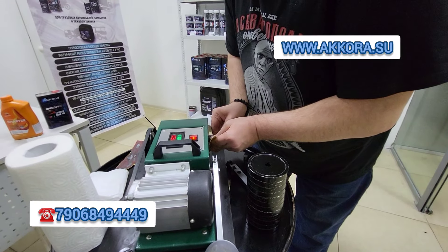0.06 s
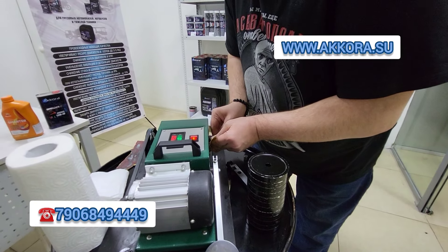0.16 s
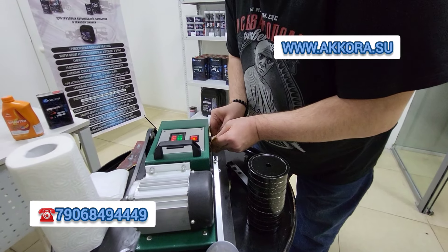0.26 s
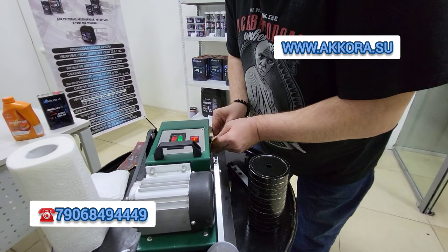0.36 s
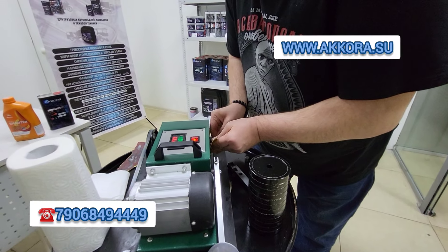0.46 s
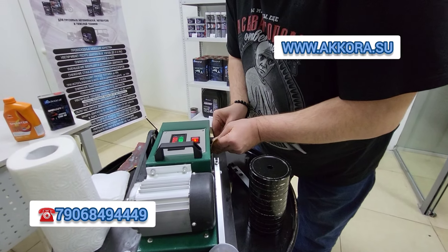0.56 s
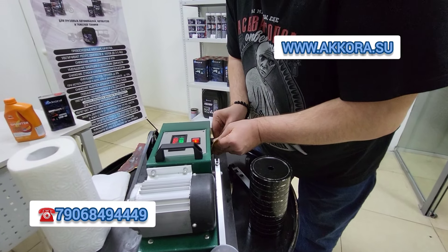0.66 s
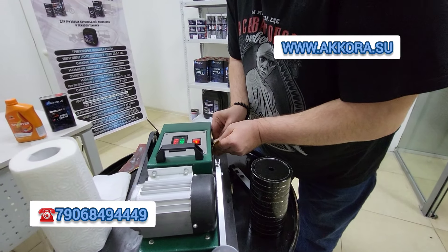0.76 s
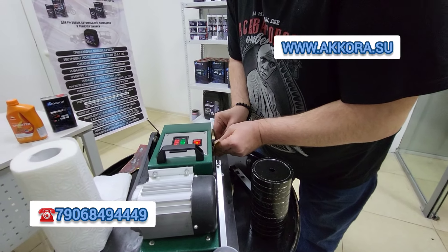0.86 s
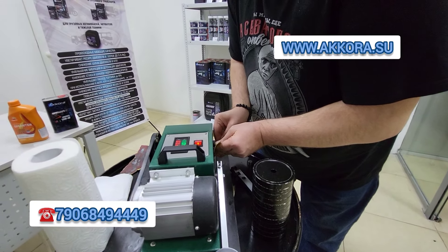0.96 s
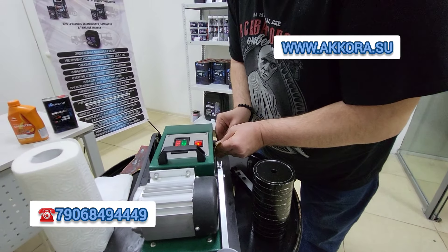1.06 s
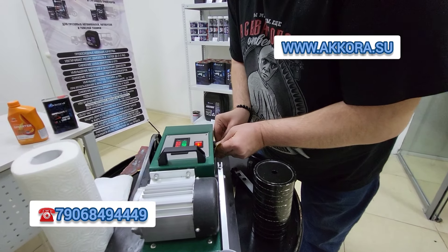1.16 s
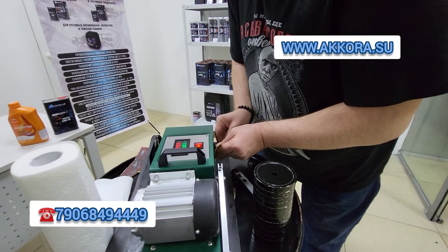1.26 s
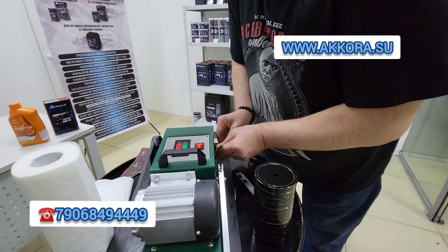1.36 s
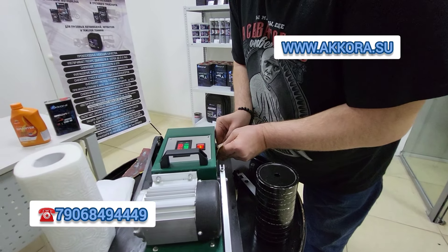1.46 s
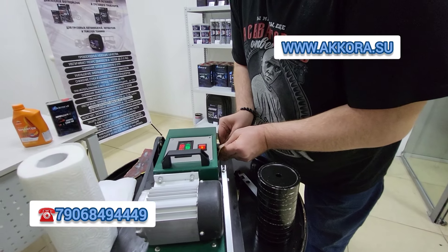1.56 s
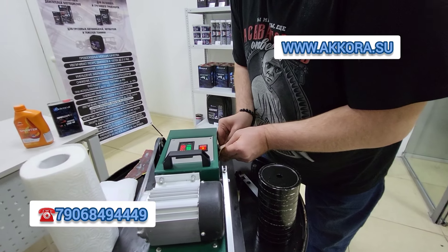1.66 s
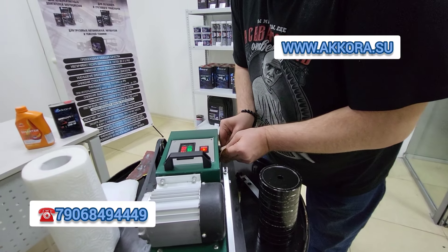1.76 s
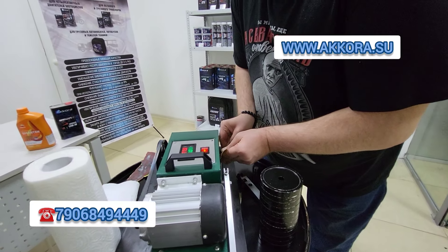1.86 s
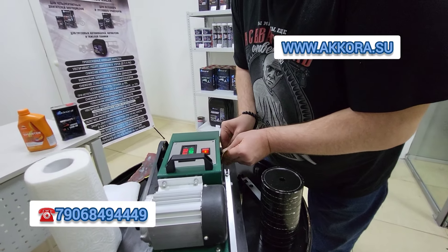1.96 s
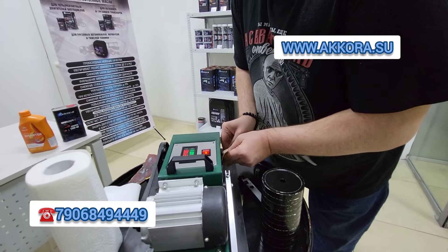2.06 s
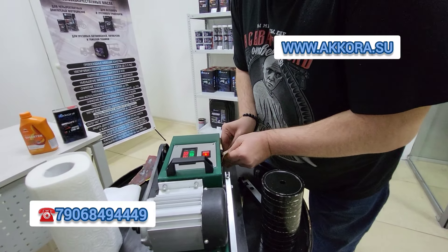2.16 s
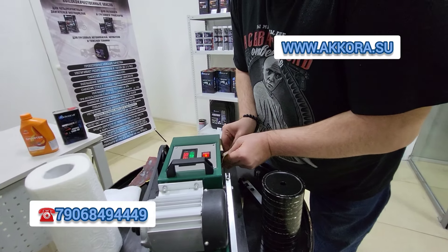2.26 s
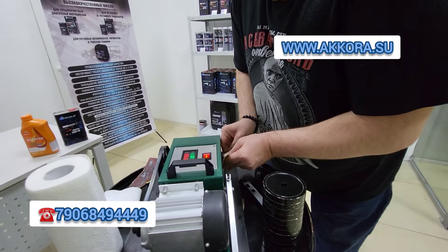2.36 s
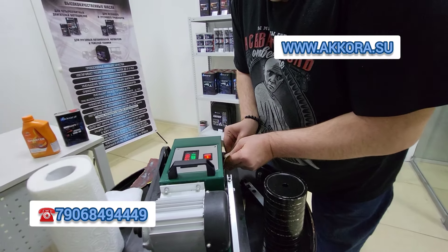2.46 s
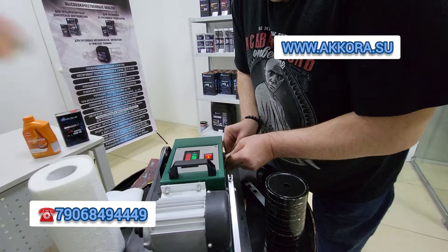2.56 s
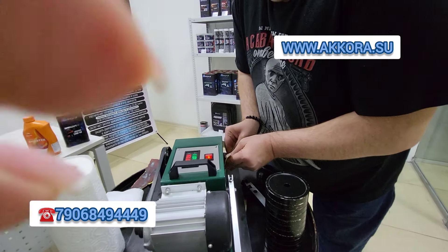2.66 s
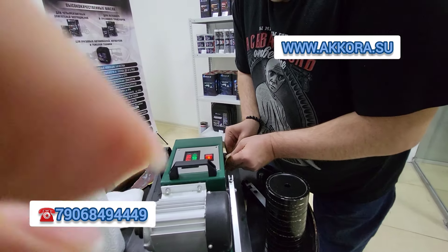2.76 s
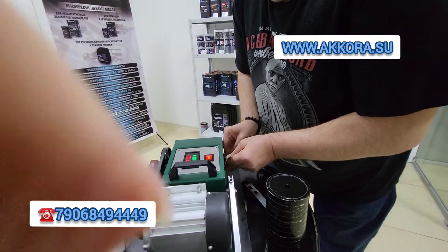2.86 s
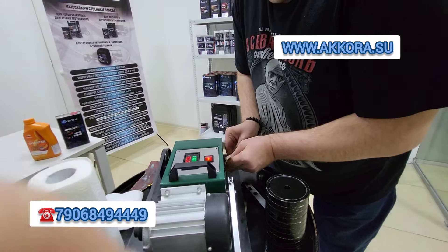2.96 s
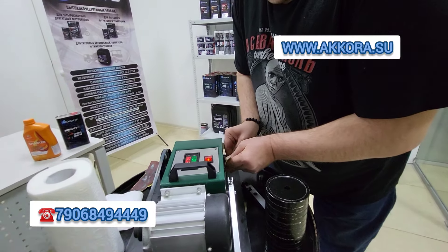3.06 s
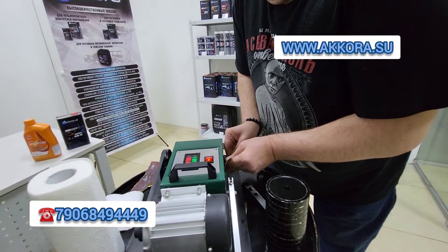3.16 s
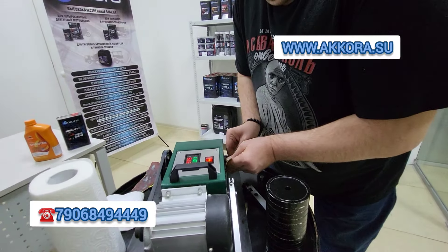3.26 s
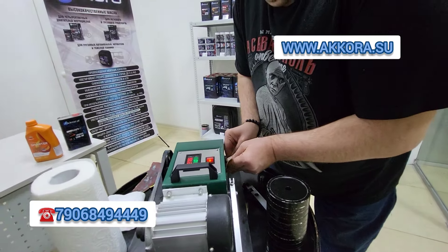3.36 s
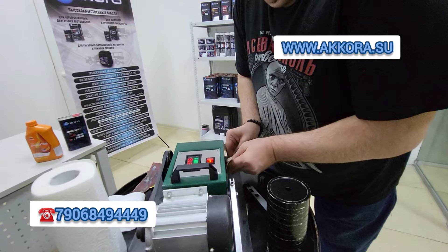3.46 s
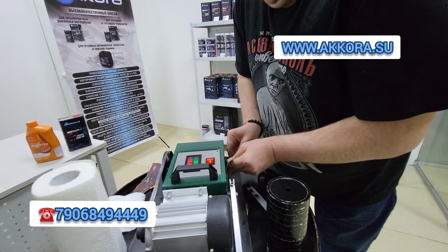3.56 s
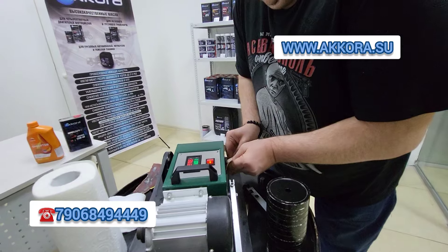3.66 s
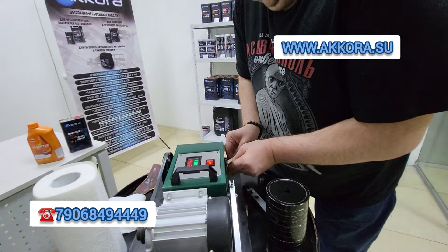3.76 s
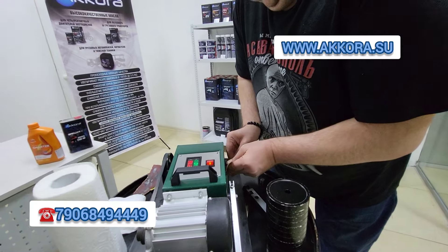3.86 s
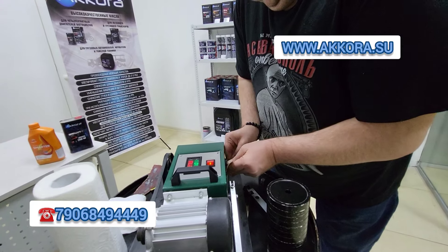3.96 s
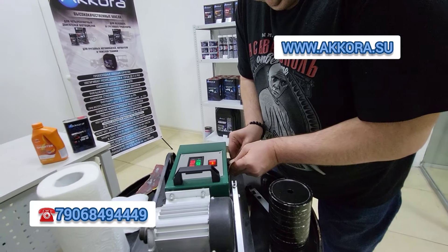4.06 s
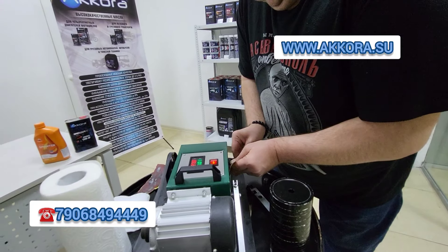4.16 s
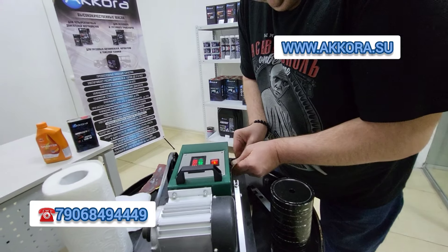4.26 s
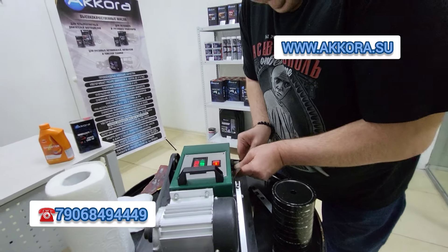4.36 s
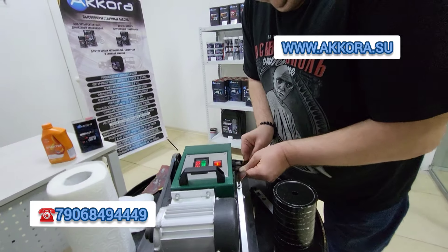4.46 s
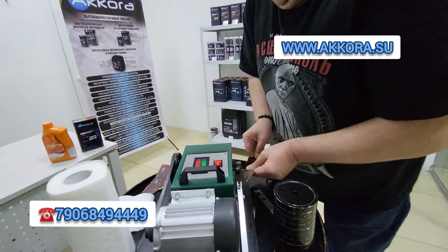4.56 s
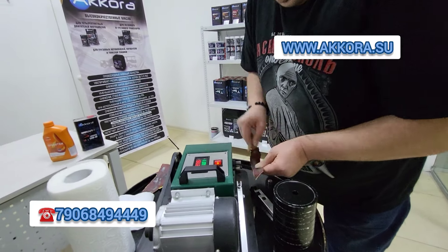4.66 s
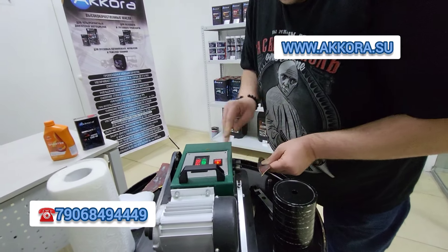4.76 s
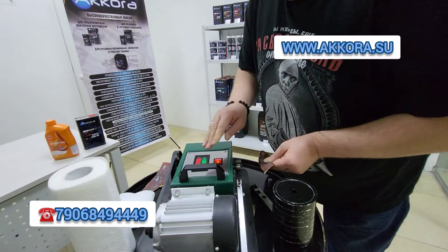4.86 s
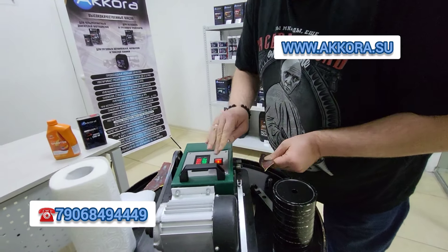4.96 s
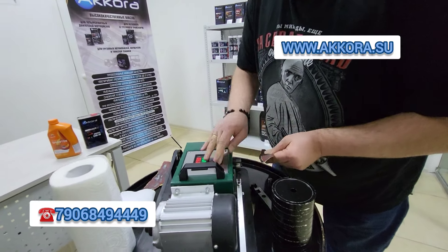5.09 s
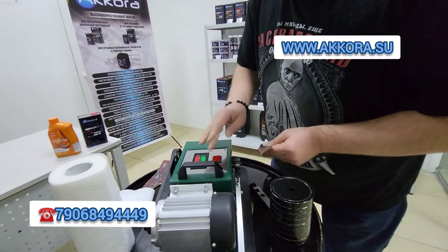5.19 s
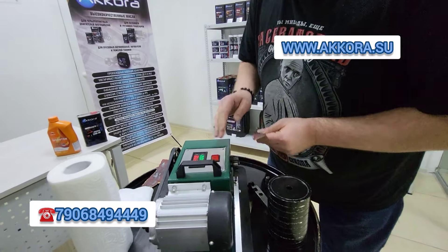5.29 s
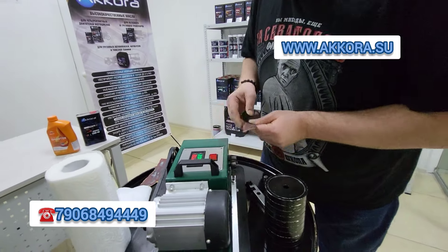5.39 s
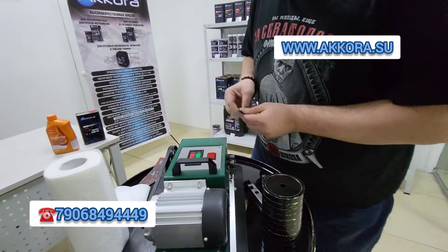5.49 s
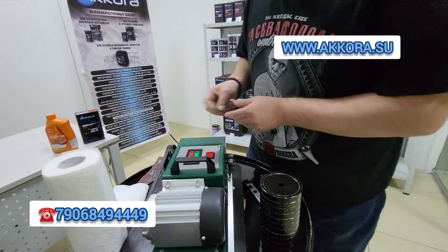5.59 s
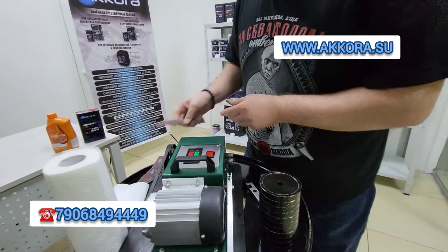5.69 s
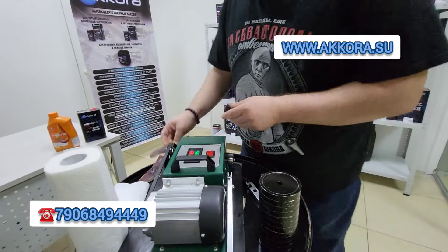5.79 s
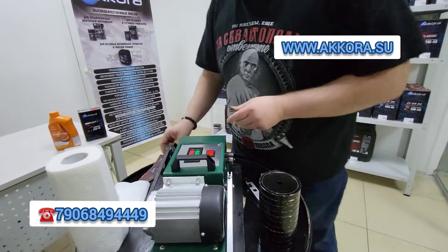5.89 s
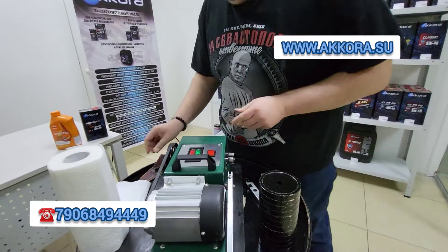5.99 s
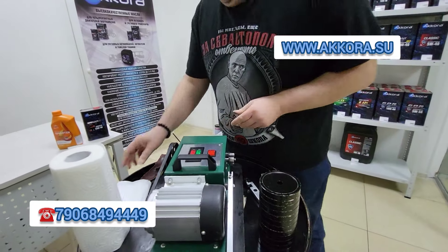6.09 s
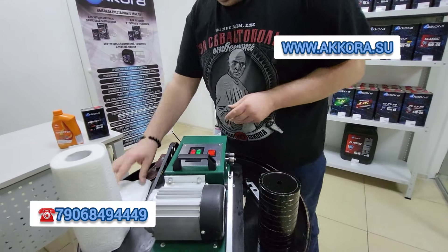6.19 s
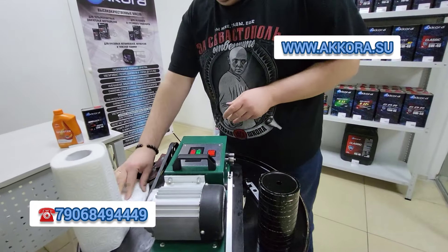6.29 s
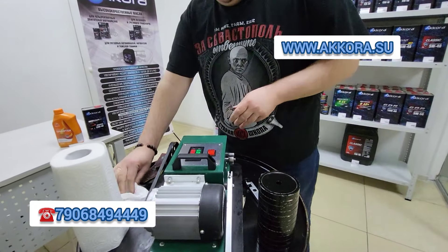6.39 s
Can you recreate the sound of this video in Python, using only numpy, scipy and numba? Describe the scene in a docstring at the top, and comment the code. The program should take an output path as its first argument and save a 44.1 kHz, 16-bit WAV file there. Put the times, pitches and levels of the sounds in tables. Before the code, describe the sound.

Gritty sanding on a motor-driven steel roller stops, a loud switch click cuts the motor's hum, and soft rustling follows in a small workshop.

```python
"""An induction motor hums in a small workshop while an abrasive strip is held to its steel roller.
Grit impacts hiss and excite the resonances of steel and strip, whose pitch slides with the grip.
At about 4.4 s the strip catches and is pulled away; at 5.05 s the stop switch snaps, its box rings
and the motor dies away. Then cloth and paper rustle as someone moves round the bench.
A phone hears it all from about a metre, through two microphone ports."""
import sys
import numpy as np
from scipy import signal
from scipy.fft import rfft, irfft, next_fast_len
from scipy.io import wavfile
from numba import njit

SR = 44100
rng = np.random.default_rng(int(sys.argv[2]) if len(sys.argv) > 2 else 0)


def waveform_to_disk(signal):
    """Save audio, clipped to [-1, 1], as 16-bit WAV at the path in sys.argv[1]."""
    frames = np.transpose(np.atleast_2d(signal))
    scaled = np.clip(frames, -1, 1) * 32767
    samples = np.round(scaled).astype(np.int16)
    wavfile.write(sys.argv[1], SR, samples)


N = 283541
TIME = np.arange(N) / SR
FFT_SIZE = next_fast_len(N, real=True)
FREQ = np.maximum(np.arange(FFT_SIZE // 2 + 1) * SR / FFT_SIZE, 1)
LIFT_S, STOP_S = 4.371, 5.05  # the strip leaves the roller; the power is cut


# Ring of the steel, shifting with the point of contact: time_s, pitch_hz, relative_db
ROLLER_RING = [(0, 4380, 1), (1.15, 4500, -2), (1.42, 4520, -6), (2.5, 4240, -10.5), (2.78, 4400, 0),
               (3.05, 4650, -3.5), (3.35, 4280, -4), (3.8, 4350, -2), (4.3, 4200, -2.5)]
# Steady modes of the steel and the rig's arm: pitch_hz, width_hz, relative_db, left_minus_right_db
STEEL_MODES = [(3160, 490, -6.5, 22)]
ARM_MODES = [(1795, 27, -9, -6), (2122, 280, -6.5, -7.5)]

def rubbing():
    """Forced vibration: broadband friction drives the steel, the arm and the strip at their resonances."""
    ring_hz, ring_db = curves(ROLLER_RING)
    friction = abrasion()
    steel = undb(1) * unit(band(ring_hz, width_hz=770.0) * sides(10.5)) + ringing(STEEL_MODES)
    arm = ringing(ARM_MODES)
    strip = taut_strip()
    # a shallow spectral dip follows just under the ring
    hollow = 0.31 * np.array([sweep(channel, 0.82 * ring_hz, 390.0) for channel in friction])
    sound = friction - hollow + arm + undb(ring_db + 1.5 * walk(6.6)) * steel + strip
    # once the strip is lifted only the room rings on
    contact = sustain(LIFT_S, t60=0.41)
    return sound * undb(-35.5 + 0.5 * walk(23)) * contact


# Spectra of the fine hiss and the coarse bite of the grit: frequency_hz, relative_db
HISS_SPECTRUM = [(2940, -14.5), (5000, -2.5), (5270, -2), (5630, 1.5), (6100, -0.5), (7000, 1.5), (7660, 2),
                 (9300, -6.5), (10800, -4), (11600, -7.5), (12900, -1.5), (14500, -6.5), (15500, -9)]
BITE_SPECTRUM = [(590, -29), (1000, -21), (1120, -0.5), (1240, -12.5), (1370, -5), (1660, -1), (1800, -0.5),
                 (1910, -1.5), (3500, -3), (4550, -14), (7700, -120)]
# Stereo balance of both: frequency_hz, left_minus_right_db
ABRASION_BALANCE = [(900, 6), (1400, -5.5), (2200, -5.5), (3100, 2), (4000, -4.5), (4900, 9.5),
                    (5900, -1.5), (6800, 4), (7700, -8), (8800, 0), (10200, -7), (11600, -2), (14200, -9.5)]

def abrasion():
    """Friction noise: countless random grit impacts sum to a hiss, and pressure adds a coarse bite."""
    pull = np.clip(1 + (TIME - LIFT_S) / 0.3, 0, 1)  # the strip bites harder as it is dragged off
    grit = unit(rng.standard_normal(N) * rng.random(N) ** 2)
    direct = unit(np.array([grit, np.roll(grit, 15)]))  # the straight path reaches the left port first
    coarse = room(grit, t60=0.14, coherent_share=0.76) + undb(-8.5) * direct
    fine = room(grit, t60=0.1, coherent_share=0.38) + undb(-7) * direct
    fine = hand_reflection(fine, delay_s=0.0011, gain=0.36)
    balance = sides(across(ABRASION_BALANCE))
    hiss = undb(4.5 + 1.5 * pull) * shape(fine, undb(across(HISS_SPECTRUM)) * balance)
    bite = undb(-0.5 + 4.5 * pull) * shape(coarse, undb(across(BITE_SPECTRUM)) * balance)
    return hiss + bite


# Resonance of the strip as the grip is held, slackened and drawn tight: time_s, pitch_hz
STRIP_PITCH = [(0, 4940), (1.24, 5100), (1.35, 3060), (1.55, 2960), (2.34, 2750), (2.47, 6040),
               (2.56, 6900), (2.75, 7600), (4.39, 7700)]

def taut_strip():
    """Resonance under tension: pitch follows the grip, loudest when freshly laid on or sliding."""
    grip_hz, = curves(STRIP_PITCH)
    octaves_per_s = np.abs(np.gradient(np.log2(grip_hz))) * SR
    sliding = np.tanh(octaves_per_s / 1.8)
    fresh = np.exp(-(TIME / 0.71) ** 2)
    pitch_hz = grip_hz * (1 + 0.014 * walk(12))  # the fingers tremble
    fundamental = band(pitch_hz, width_hz=1100.0)
    octave = band(np.minimum(2 * pitch_hz, SR / 3), width_hz=790.0) * sides(-15)
    ring = fundamental + undb(-15.5 + 9 * fresh) * octave
    return undb(-10 + 7 * fresh + 7 * sliding) * ring * sides(4)


# Rasps where the strip bites harder: centre_s, half_length_s, level_db
STRIP_RASPS = [(.22, .05, -35), (0.507, 0.066, -35.5), (.75, 0.092, -32), (.98, 0.075, -34),
               (1.478, .067, -32), (1.703, 0.066, -34), (1.93, 0.089, -34), (2.35, 0.061, -34),
               (2.862, .08, -37), (3.437, 0.15, -35), (3.99, 0.11, -33), (4.248, .092, -32.5)]
# Catches of its edge as it leaves the roller: start_s, level_db, t60_s
EDGE_CATCHES = [(4.346, -21, 0.14), (4.367, -25, 0.045), (4.384, -25, 0.071)]

def snags():
    """Friction transients: a harder bite swells smoothly, a catch starts at once and decays."""
    rasps = sum(undb(db) * np.exp(-2 * ((TIME - centre) / half_length) ** 2)
                for centre, half_length, db in STRIP_RASPS)
    catches = sum(undb(db) * fade(start, t60) for start, db, t60 in EDGE_CATCHES)
    return rasps * noise(peak(2640, width_hz=1170)) + catches * noise(peak(1940, width_hz=1900))


# Magnetic hum of the stator: harmonic_number, level_db
STATOR_HUM = [(1, -32.5), (2, -59), (3, -55.5), (4, -65.5), (5, -78.5), (6, -66.5), (9, -61.5), (10, -65)]
# Whine of the rotor slots: shaft_multiple, sideband_in_hum_multiples, relative_db
ROTOR_WHINE = [(22, -1, -60), (22, 0, -45), (23, 0, -53), (22, 1, -56), (22, 3, -56), (22, 4, -51),
               (44, 0, -52), (44, 3, -58), (66, -3, -57), (21, 0, -63), (25, 0, -64), (20, 0, -66)]
# Tones of the shaken bench, which beat against the hum: pitch_hz, relative_db
BENCH_TONES = [(63.3, -60), (108, -53), (112.4, -50), (116.6, -56), (121, -57), (209.5, -59), (224.5, -63),
               (475, -65), (551, -59), (899.7, -53)]
# Noise of the bearings: frequency_hz, relative_db
BEARING_SPECTRUM = [(410, -39), (700, -24.5), (916, -1.5), (1230, -13), (1360, -6), (1610, -25.5),
                    (1780, -15), (2030, -16.5), (2400, -14.5), (2760, -28), (3020, -21), (3180, -32.5),
                    (6520, -32.5), (14100, -41.5), (15000, -39.5)]
# Resonances of the bench: pitch_hz, width_hz, level_db
BENCH_MODES = [(62, 39, -55), (115, 19, -49), (144, 20, -72), (198, 140, -56.5)]
HUM_HZ, SHAFT_HZ = 100.05, 24.655

def motor():
    """Magnetic force pulses at twice the mains frequency; rotation adds whine, noise and vibration."""
    hum_cycles = HUM_HZ * TIME
    coasting = np.exp(-np.maximum(TIME - STOP_S, 0) / 4.7)
    speed = (1 + 0.0004 * walk(1.8)) * coasting
    shaft_turns = np.cumsum(SHAFT_HZ * speed) / SR
    hum = sum(tone(harmonic * hum_cycles, db, waver=6.0) for harmonic, db in STATOR_HUM)
    whine = sum(tone(multiple * shaft_turns + sideband * hum_cycles, db, waver=2.0)
                for multiple, sideband, db in ROTOR_WHINE)
    shake = sum(tone(hz * TIME, db, waver=-3.5) for hz, db in BENCH_TONES)
    rolling = room(rng.standard_normal(N), t60=0.98, coherent_share=0.71)
    load_db = 0.84 * np.sin(2 * np.pi * shaft_turns)  # the bearings are loaded once a turn
    bearings = undb(-42.3 + load_db) * shape(rolling, undb(across(BEARING_SPECTRUM)))
    fan = undb(-53.5) * noise(peak(565, width_hz=130))
    bench = sum(undb(db) * noise(peak(hz, width)) for hz, width, db in BENCH_MODES)
    return sides(1) * (hum * sustain(STOP_S, t60=0.3)
                       + undb(-1.9) * whine * sustain(STOP_S, t60=0.33)
                       + (undb(-5) * shake + fan + bench) * sustain(STOP_S, t60=0.83)
                       + bearings * sustain(STOP_S, t60=0.6))


# Trigger, slam and bounce of the switch: start_s, relative_db, t60_s, tilt_db_per_octave
SWITCH_IMPACTS = [(5.045, -16.5, .016, 3), (5.0474, -2, 0.012, 0.5), (5.0505, -14.5, 0.014, -1)]
# Spectra of the snap and of the room's answer: frequency_hz, relative_db
SNAP_SPECTRUM = [(240, -40), (400, -8.5), (570, -24), (863, -16), (1230, -17.5), (1520, -3), (2310, -5.5),
                 (3390, -17.5), (5060, -7.5), (6090, -10), (7550, -24.5), (8410, -15.5), (11300, -12),
                 (15800, -21.5)]
WALL_SPECTRUM = [(280, -29.5), (480, -6), (615, -16.5), (861, -1), (1280, -21), (1420, -6), (1590, -14.5),
                 (2100, -2.5), (3450, -11.5), (6110, -14.5), (7170, -20.5), (8800, -14.5), (15800, -19)]
# Modes of the switch box and frame: pitch_hz, level_db, t60_s
BOX_MODES = [(83.3, -34.5, 0.53), (151.8, -25.5, 0.27), (194, -13.5, .16), (226, -21, 0.12),
             (820, -39.5, 0.27), (910, -36.5, .33), (1456, -29, 0.15), (1810, -29, 0.15), (2280, -8, .015),
             (2360, -25.5, .09), (2620, -36.5, 0.086), (2800, -42.5, 0.26), (3050, -38, 0.22),
             (4500, -41.5, .2), (4900, -20, 0.013), (5900, -33.5, .12), (8635, -39.5, .17)]

def stop_switch():
    """Impact excitation: the contacts slam open, the box rings in damped modes, the room reverberates."""
    colour = undb(across(SNAP_SPECTRUM))
    octaves = np.log2(FREQ / 3000)
    snap = sum(undb(db) * fade(start, t60) * noise(colour * undb(tilt * octaves))
               for start, db, t60, tilt in SWITCH_IMPACTS)
    slam_s = SWITCH_IMPACTS[1][0]
    age_s = np.maximum(TIME - slam_s, 0)
    ring = np.zeros(N)
    for hz, db, t60 in BOX_MODES:
        build_up = 1 - np.exp(-(hz * age_s) ** 2)  # takes about a cycle, so the thump comes late
        ring += undb(db) * fade(slam_s, t60) * build_up * np.sin(2 * np.pi * hz * age_s)
    walls = undb(-22.5) * fade(slam_s, t60=0.24) * noise(undb(across(WALL_SPECTRUM)))
    tail = undb(-42.5) * fade(slam_s, t60=0.54) * noise(peak(1500, width_hz=3000))
    return undb(-4.5) * snap * sides(-2.5) + ring + walls + tail


# Strokes of cloth and paper: peak_s, attack_s, hold_s, relative_db
RUSTLE_STROKES = [(5.685, 0.027, 0.014, -43.5), (5.887, 0.018, .07, -56), (6.053, 0.065, 0.035, -37.5),
                  (6.171, 0.083, .22, -39.5)]
# Spectra of the soft rustle and its crisp edge: frequency_hz, relative_db
CLOTH_SPECTRUM = [(260, -36), (450, -14), (595, -16), (823, -8), (890, -12), (930, -4.5), (1420, -5.5),
                  (1920, 0.5), (2810, -3.5), (3110, -8), (4250, -7.5), (6500, -19), (8450, -44),
                  (14300, -120)]
CRISP_SPECTRUM = [(3240, -22), (5500, -3.5), (7970, -5.5), (11400, -15.5), (13100, -13), (15800, -15)]
# Stereo balance of both: frequency_hz, left_minus_right_db
RUSTLE_BALANCE = [(400, 10), (1300, -2), (2400, -4), (4400, 7), (8100, -4), (15000, -6)]

def rustle():
    """Sliding friction of cloth and paper: strokes add in power, and stronger ones sound crisper."""
    envelope = np.sqrt(sum((undb(db) * swell(peak_s, attack, hold, t60=0.38)) ** 2
                           for peak_s, attack, hold, db in RUSTLE_STROKES))
    force = envelope / undb(-40)
    balance = sides(across(RUSTLE_BALANCE))
    cloth = undb(2) * envelope * noise(undb(across(CLOTH_SPECTRUM)) * balance)
    crisp = undb(-45.5) * force ** 1.1 * noise(undb(across(CRISP_SPECTRUM)) * balance)
    return (cloth + crisp) * undb(0.66 * walk(70))


# Bumps of the body against the bench: peak_s, hold_s, level_db
BODY_BUMPS = [(5.7, 0.062, -53.5), (5.89, 0.028, -58), (6.017, .1, -53.5), (6.225, .085, -47.5)]
# Their spectrum: frequency_hz, relative_db
BUMP_SPECTRUM = [(29, -37), (50, -12), (151, -9.5), (253, -12.5), (290, -9), (325, -14.5), (600, -20),
                 (780, -22), (1320, -120)]

def bumps():
    """Soft impacts: a slow, yielding contact excites mostly low frequencies."""
    envelope = sum(undb(db) * swell(peak_s, 0.023, hold, t60=0.81) for peak_s, hold, db in BODY_BUMPS)
    return envelope * noise(undb(across(BUMP_SPECTRUM)))


# The press of the stop button just before the switch snaps, then light knocks round the bench: start_s,
# level_db, t60_s, pitch_hz
PRESS_AND_KNOCKS = [(5.03, -34, 0.037, 183.5), (5.242, -59, .04, 3500), (5.478, -59, .03, 5000),
                    (5.569, -65, .02, 4450), (5.877, -47, 0.025, 4170), (5.916, -41.5, 0.079, 2130),
                    (5.939, -42.5, 0.1, 109)]

def knocks():
    """Heavily damped impacts: each is a short burst of noise in one broad resonance."""
    sound = np.zeros((2, N))
    for start, db, t60, hz in PRESS_AND_KNOCKS:
        body = peak(hz, width_hz=0.95 * hz)
        burst = ports() * fade(start, t60)
        sound += undb(db) * filtered(burst, unit(body))
    return sound


# Background noise of the room: frequency_hz, relative_db
AIR_SPECTRUM = [(20, -19.5), (35, -8.5), (55, 5), (78, -9), (130, -7), (260, -6.5), (420, -11.5),
                (770, -32.5), (2000, -25.5), (3000, -28), (6300, -24), (9200, -31), (15800, -29.5)]

def workshop():
    """Ambient noise floor: a quiet diffuse field with a trace of mains hum."""
    air = noise(undb(across(AIR_SPECTRUM))) * undb(-62.5 + 0.4 * walk(4.02))
    return air + tone(HUM_HZ * TIME, db=-68.0, waver=-2.0)


# Likeness of the sound at the two microphone ports: frequency_hz, correlation
PORT_COHERENCE = [(25, .5), (60, 0.59), (130, 0.62), (300, 0.74), (640, .93), (1400, 0.44), (3000, 0.091),
                  (15000, .01)]

def ports():
    """Diffuse-field coherence: white noise, alike at both ports in the bass, unrelated in the treble."""
    coherence = across(PORT_COHERENCE)
    mid, side = rfft(rng.standard_normal((2, FFT_SIZE)))
    spectra = mid * np.sqrt(1 + coherence) + np.array([[1], [-1]]) * side * np.sqrt(1 - coherence)
    return unit(irfft(spectra, FFT_SIZE)[:, :N])


def room(x, t60, coherent_share):
    """Reverberation: part of the power is x convolved with a decaying tail, the rest diffuse noise."""
    reflected = shape(x, rfft(ports() * fade(0, t60), FFT_SIZE))
    return np.sqrt(coherent_share) * reflected + np.sqrt(1 - coherent_share) * ports()


def hand_reflection(x, delay_s, gain):
    """Comb filtering: an echo off the moving hand makes wandering peaks and dips."""
    lags = delay_s * SR * (1 + 0.063 * np.array([walk(2.6), walk(1.9)]))
    samples = np.arange(N)
    echo = np.array([np.interp(samples - lag, samples, channel) for channel, lag in zip(x, lags)])
    return unit(x + gain * echo)


def tone(cycles, db, waver):
    """Amplitude modulation of a partial; high ones waver more and differ more between the ports."""
    mean_hz = cycles[-1] / TIME[-1]
    height = min(mean_hz / 1200, 1)
    phase = rng.uniform(0, 2 * np.pi) + 1.4 * height ** 2 * rng.standard_normal((2, 1))
    return np.sqrt(2) * undb(db + waver * height * walk(5.9)) * np.sin(2 * np.pi * cycles + phase)


def ringing(modes):
    """Superposition of steady resonances driven by noise."""
    return sum(undb(db) * unit(sides(pan) * noise(peak(hz, width))) for hz, width, db, pan in modes)


def band(hz, width_hz):
    """Moving resonance: diffuse noise through two band-passes in series, each width_hz wide."""
    return unit(np.array([sweep(sweep(channel, hz, width_hz), hz, width_hz) for channel in ports()]))


@njit
def sweep(x, hz, width_hz):
    """State-variable band-pass with a moving centre."""
    y, band_state, low_state = np.empty(len(x)), 0., 0.
    for i in range(len(x)):
        tuning, damping = np.tan(np.pi * hz[i] / SR), width_hz / hz[i]
        passed = (band_state + tuning * (x[i] - low_state)) / (1 + tuning * (tuning + damping))
        band_state = 2 * passed - band_state
        low_state += 2 * tuning * passed
        y[i] = damping * passed
    return y


def peak(hz, width_hz):
    """Frequency response of two equal resonators in series, roughly width_hz wide."""
    return 1 / (1 + 1j * (FREQ / hz - hz / FREQ) * hz / (1.36 * width_hz)) ** 2


def filtered(x, gain):
    """Linear filtering: multiply the spectrum by a gain at every frequency."""
    return irfft(rfft(x, FFT_SIZE) * gain, FFT_SIZE)[..., :N]


def shape(x, gain):
    """Spectral shaping, scaled to rms 1."""
    return unit(filtered(x, gain))


def noise(gain):
    """Coloured diffuse noise of rms 1."""
    return shape(ports(), gain)


def walk(rate_hz):
    """Low-passed noise: a smooth random drift of rms 1."""
    return shape(rng.standard_normal(N), np.exp(-FREQ / rate_hz))


def fade(start, t60):
    """Exponential decay from a moment on, by 60 dB in t60 seconds."""
    return (TIME >= start) * sustain(start, t60)


def sustain(end, t60):
    """Steady state until a moment, then exponential decay."""
    return undb(-60 * np.maximum(TIME - end, 0) / t60)


def swell(peak_s, attack, hold, t60):
    """Gaussian rise up to a moment, a hold, then exponential decay."""
    rise = np.exp(-(np.minimum(TIME - peak_s, 0) / attack) ** 2)
    return rise * sustain(peak_s + hold, t60)


def curves(table):
    """Linear interpolation of each column through time."""
    times, *columns = np.transpose(table)
    return [np.interp(TIME, times, column) for column in columns]


def across(table):
    """Interpolation of (frequency_hz, value) points on a log-frequency axis."""
    hz, value = np.transpose(table)
    return np.interp(np.log(FREQ), np.log(hz), value)


def sides(db):
    """Left and right gains for a level difference."""
    return undb(np.array([[1], [-1]]) * db / 2)


def unit(x):
    """Normalisation to rms 1."""
    return x / np.sqrt(np.mean(np.abs(x) ** 2))


def undb(db):
    """Decibels to amplitude gain."""
    return 10 ** (np.asarray(db) / 20)


def scene():
    """Superposition: the pressures of all sources round the bench add."""
    return motor() + rubbing() + snags() + stop_switch() + rustle() + bumps() + knocks() + workshop()


def record(dry):
    """Band limiting: the phone thins the deepest bass, clips at full scale and cuts the top."""
    bass_cut = signal.butter(2, 28, "high", fs=SR, output="sos")
    treble_cut = signal.ellip(10, 0.2, 80, 15750, fs=SR, output="sos")
    clipped = np.clip(signal.sosfilt(bass_cut, dry), -1, 1)
    return signal.sosfilt(treble_cut, clipped)


dry = scene()
out = record(dry)
waveform_to_disk(out)
```